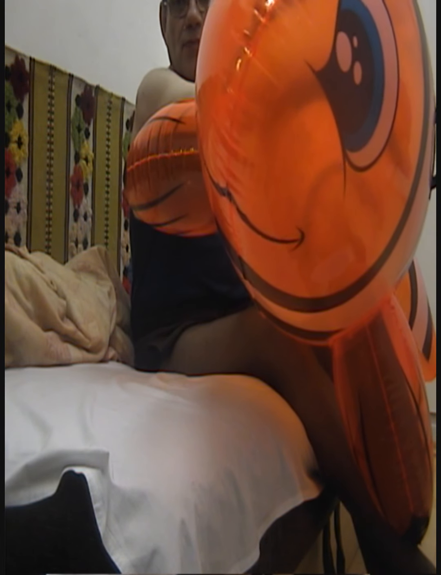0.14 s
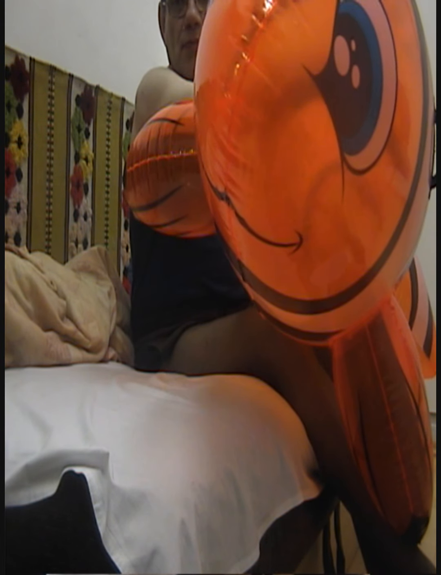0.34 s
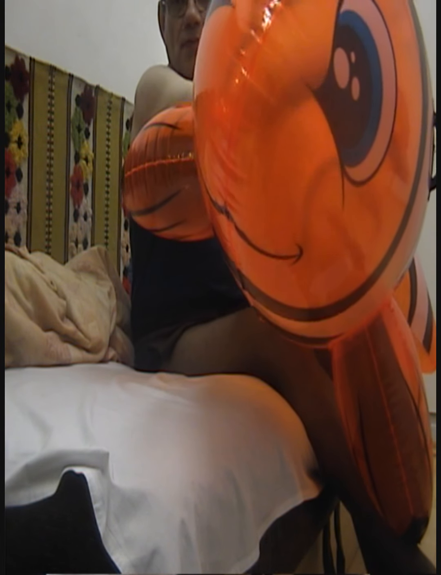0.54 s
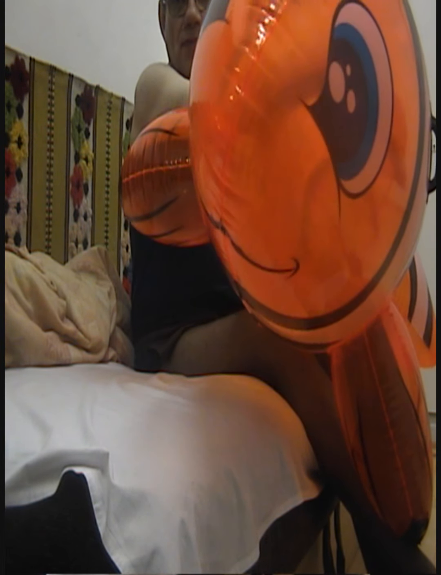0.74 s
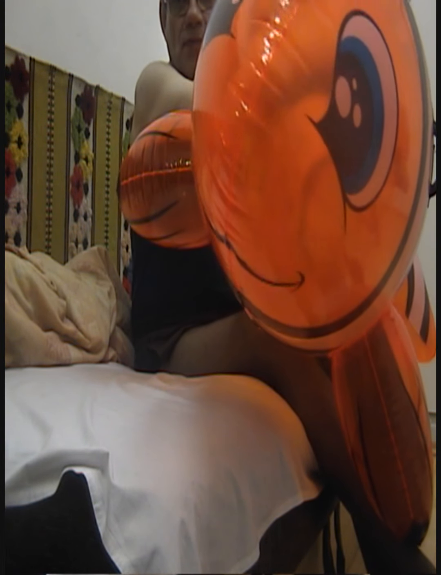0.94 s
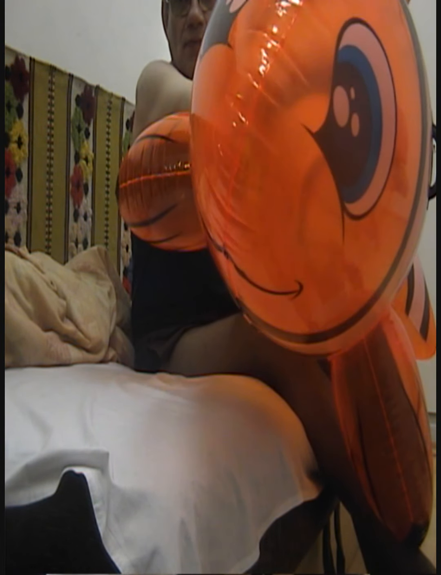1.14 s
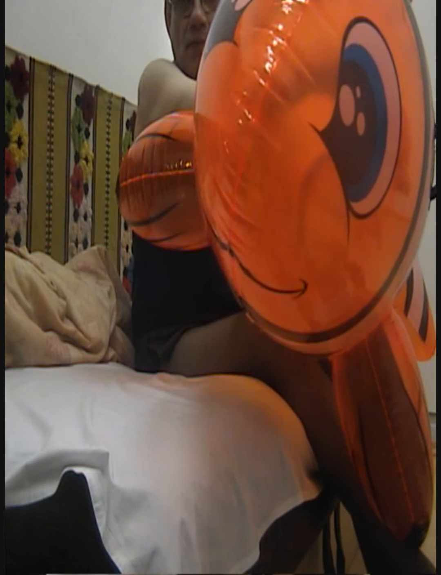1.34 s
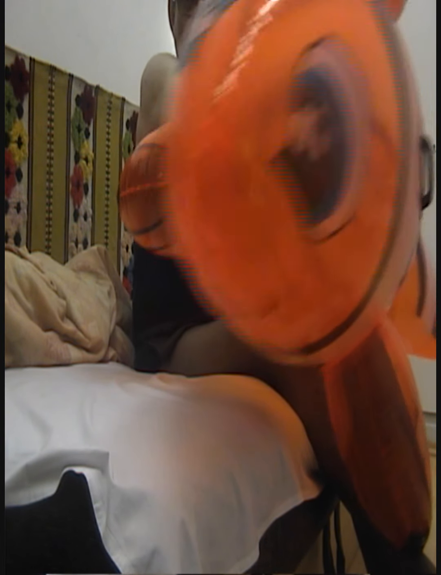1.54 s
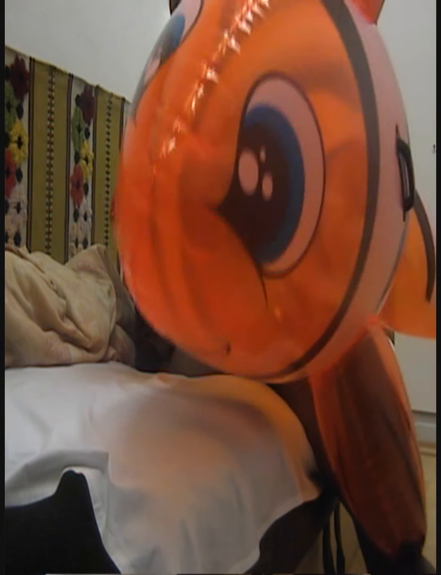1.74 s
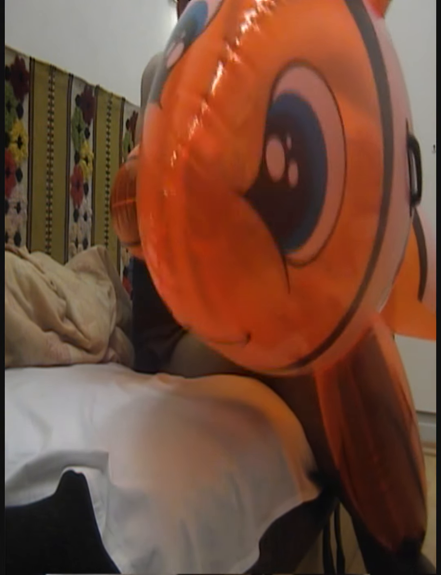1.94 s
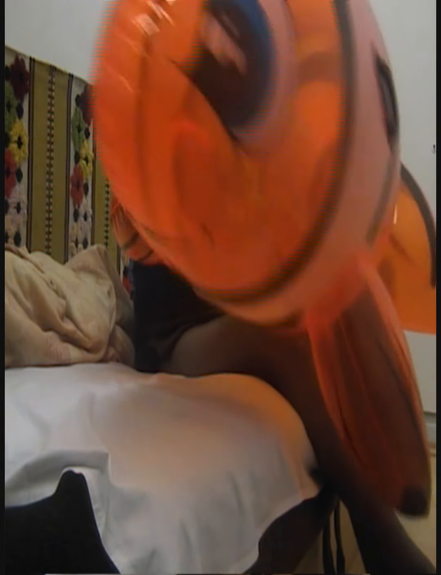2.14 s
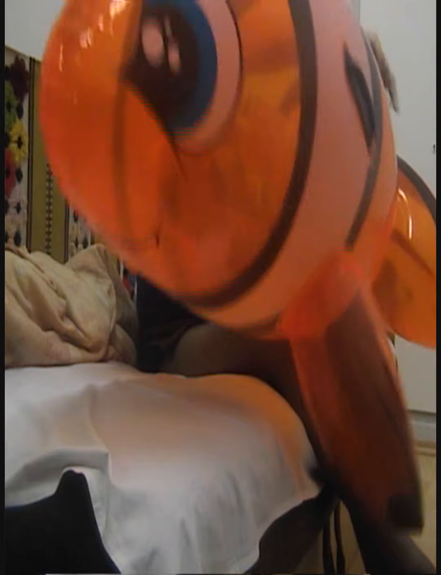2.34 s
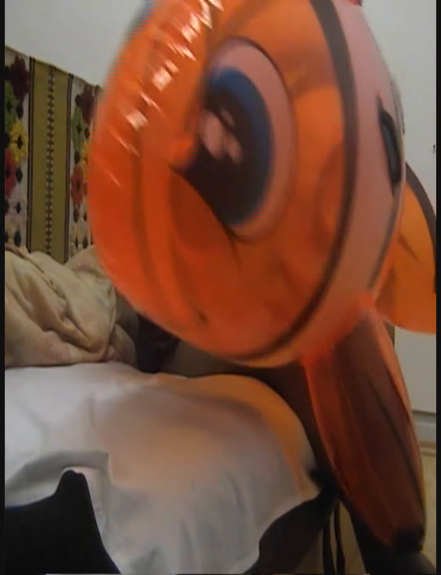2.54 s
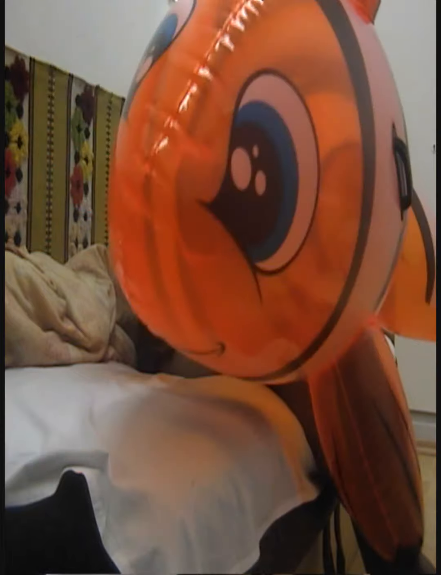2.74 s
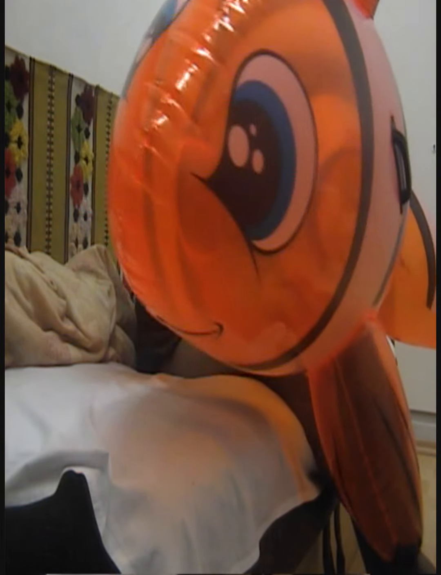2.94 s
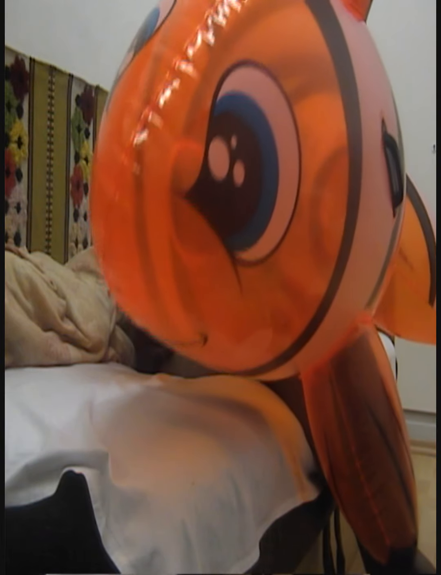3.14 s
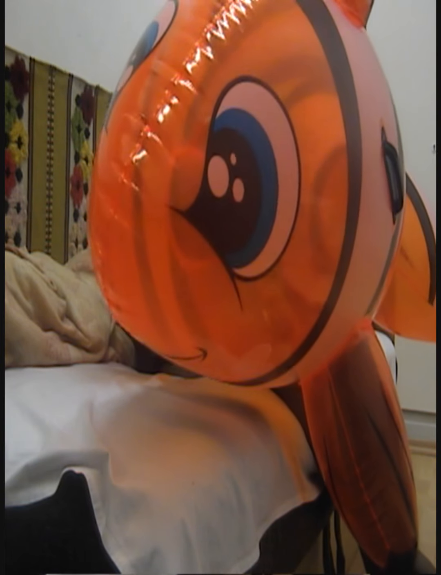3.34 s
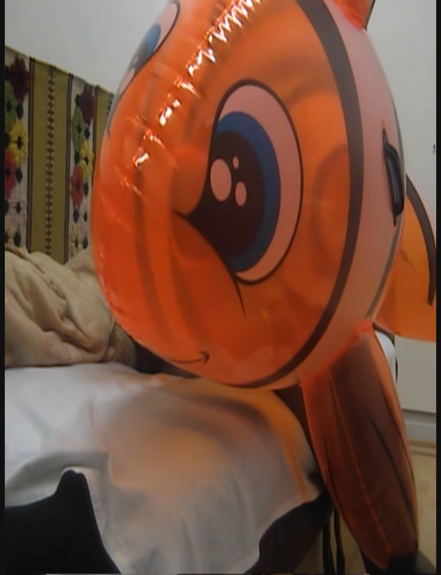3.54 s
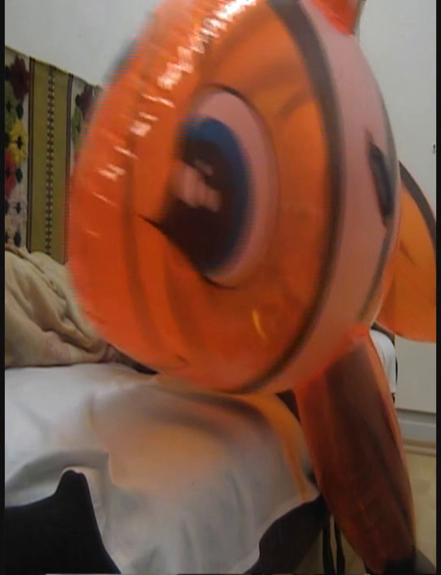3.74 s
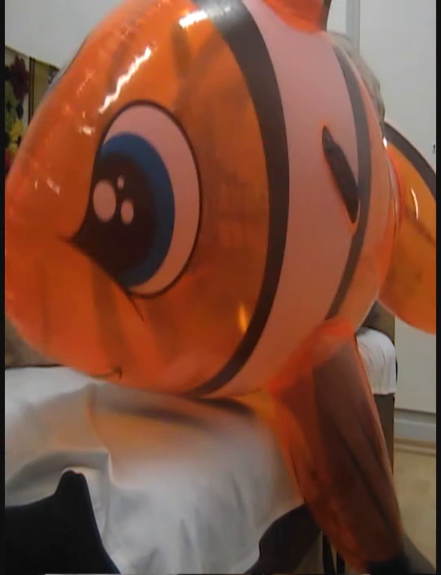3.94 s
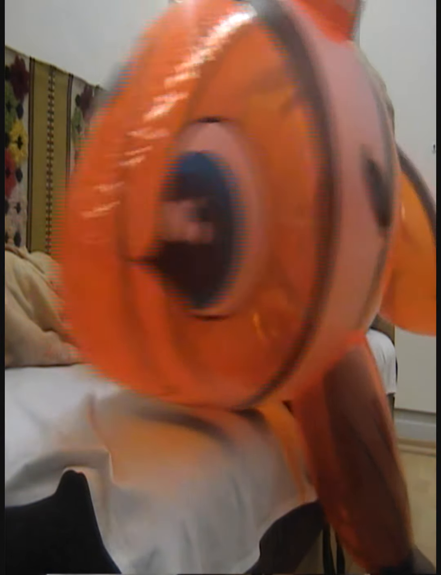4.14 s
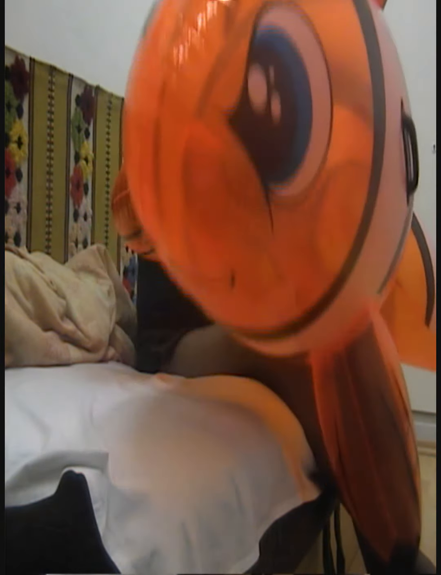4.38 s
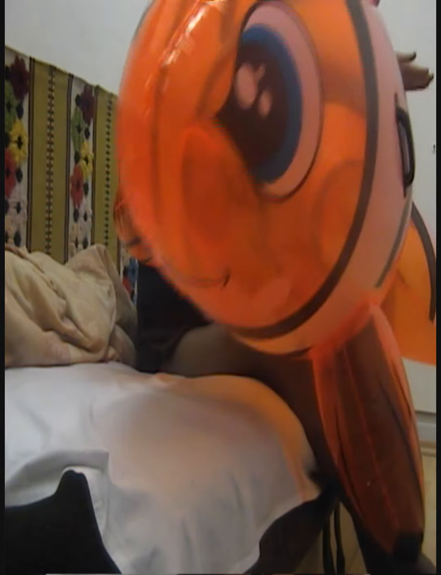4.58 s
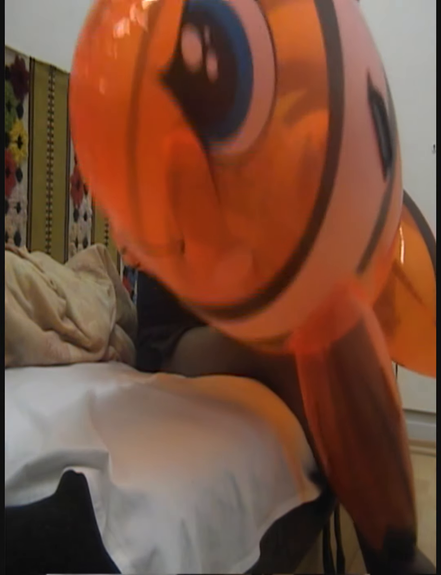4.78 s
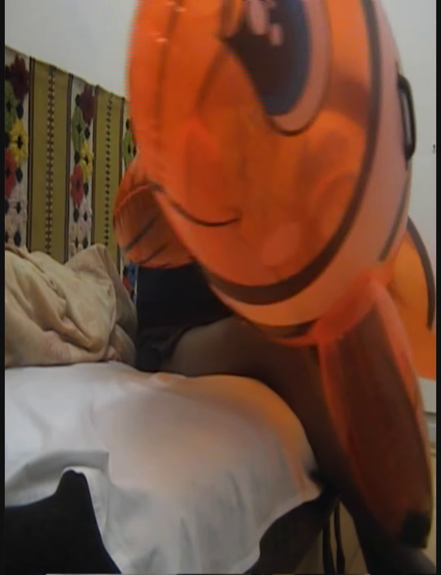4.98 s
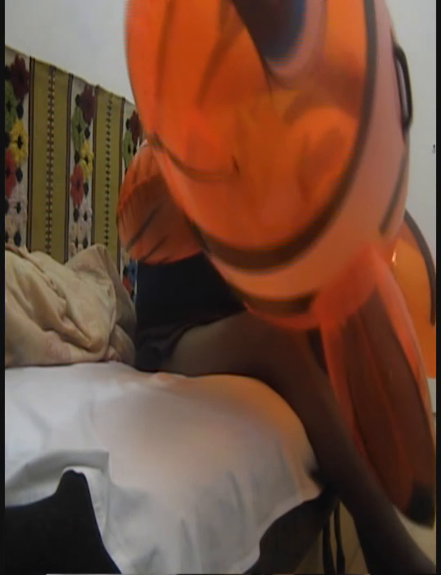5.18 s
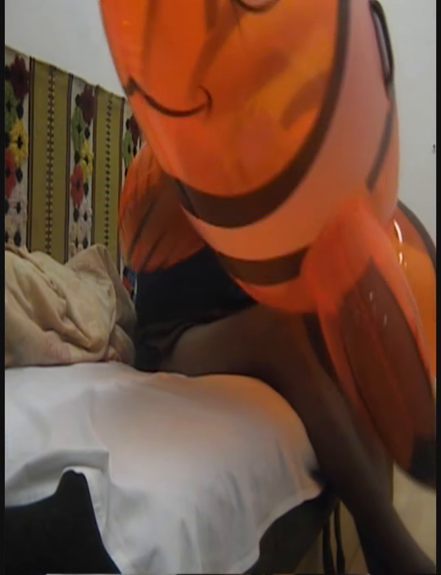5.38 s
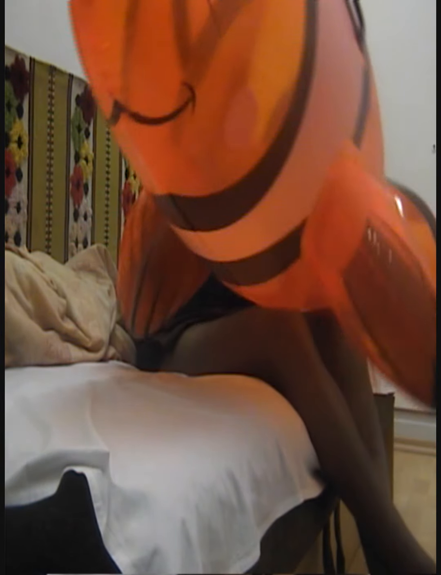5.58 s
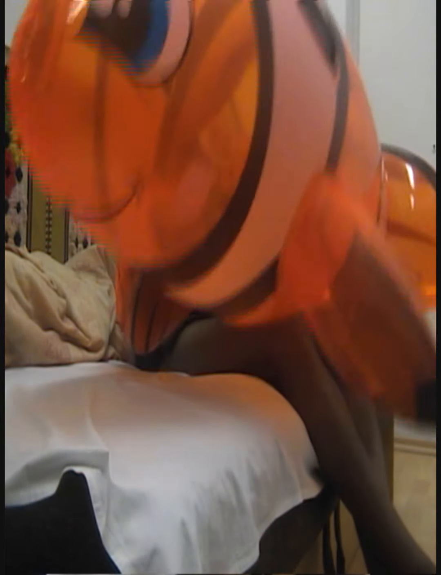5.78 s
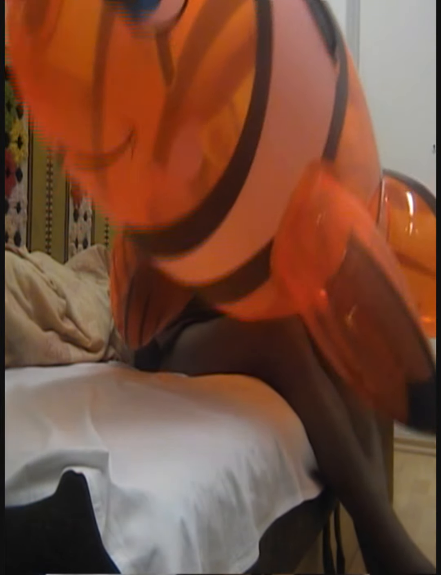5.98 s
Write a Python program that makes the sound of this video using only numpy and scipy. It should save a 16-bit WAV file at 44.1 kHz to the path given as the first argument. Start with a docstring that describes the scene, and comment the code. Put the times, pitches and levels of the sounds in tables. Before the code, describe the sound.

Hands shift a large air-filled plastic toy right by the microphone. Its skin squeaks and swishes, and knocks ring briefly with a dull, drumlike boom. A crisp knock near two seconds gives way to faint rubbing and airy fizzes; a heavy thump lands just before four seconds, followed by a rapid cluster and looser taps. The small room answers briefly over quiet hiss and hum.

```python
"""Mains hum, a thin whine and a soft hiss lie under a small bedroom from start to end, near a camera.
A taut inflated vinyl toy creaks and swishes in the hands: slips drive its skin, fine ones make the treble.
Soft knocks come first, each a noise slap with ringing drum modes; palm strokes join in.
After a sharp knock at about 2 s come high fizzes, then the hardest knock near 3.9 s.
A tight flurry at 4.8 s thins to spaced knocks; decaying noise answers as the room."""
import sys
import numpy as np
from scipy import signal
from scipy.fft import rfft, irfft, next_fast_len
from scipy.io import wavfile
from scipy.ndimage import map_coordinates

SR = 44100
rng = np.random.default_rng(int(sys.argv[2]) if len(sys.argv) > 2 else 0)


def unload_audio(sound):
    """Save the sound as a 16-bit wav file, at the path given as the first command line argument."""
    columns = np.transpose(np.atleast_2d(sound))
    # keep every value between -1 and 1, then stretch to whole-number steps
    steps = np.round(np.clip(columns, -1, 1) * 32767)
    wavfile.write(sys.argv[1], SR, steps.astype(np.int16))


N = 265041

# ringing modes of the skin and inner air: pitch_hz, level_db, t60_s
DRUM_MODES = [(95, -27, 0.39), (162.7, -11, .3), (234, -13, 0.38), (265.3, -8, .3), (326, -8, 0.5),
              (377.6, -6, 0.35), (398.8, -6, 0.33), (433.5, -9, 0.45), (473, -16, 0.5),
              (490.5, -10.5, 0.16), (543, -6, .33), (589, -9, 0.11), (620, -18, 0.22), (687, -11, 0.28),
              (750, -12.5, 0.19), (834, -11, 0.14), (1000, -18, 0.15), (1160, -19.5, 0.15),
              (1444, -13.5, 0.37), (1670, -32, 0.44), (1970, -24, 0.4)]


def amp(db):
    """Turn dB into gain."""
    return 10 ** (np.asarray(db) / 20)


def unit(x):
    """Scale to rms 1."""
    return x / np.sqrt(np.mean(x ** 2) + 1e-20)


def along(points, hz):
    """Read a curve of (Hz, value) points on a log frequency axis."""
    point_hz, value = np.transpose(points)
    return np.interp(np.log(hz + 1), np.log(point_hz + 1), value)


def wobble(rate):
    """A smooth random curve with rate knots a second."""
    knots = rng.standard_normal(int(N * rate / SR) + 4)
    return map_coordinates(knots, [np.arange(N) * rate / SR])


def filtered(x, response):
    """Multiply the spectrum of x by a complex response of frequency."""
    size = next_fast_len(x.shape[-1] + SR // 2)
    spectrum = rfft(x, size) * response(np.fft.rfftfreq(size, 1 / SR))
    return irfft(spectrum, size)[..., :x.shape[-1]]


def ports(pair, alike):
    """Mix two unrelated signals into left and right of the given likeness per frequency."""
    def mid_side_gains(hz):
        turn = np.arccos(np.clip(along(alike, hz), -1, 1)) / 2
        return np.array([np.cos(turn), np.sin(turn)])

    mid, side = filtered(pair, mid_side_gains)
    return np.array([mid + side, mid - side])


def background():
    """Shaped noise hisses, sines with unsteady pitch and level hum and whine, single swings bump."""
    # room and microphone noise, shape only: pitch_hz, level_db_per_hz
    hush_curve = [(30, -38), (70, -17), (130, -14), (200, -11.5), (290, -8.5), (420, -4.5), (900, -6.5),
                  (1300, -12), (1550, -8), (1900, -15), (4200, -20), (4900, -18), (6500, -20.5),
                  (8300, -21), (10500, -24), (15600, -30)]
    # spread of that noise: pitch_hz, left_right_likeness (-1 to 1)
    hush_likeness = [(60, 0.49), (180, 0.85), (550, 0.92), (1650, -0.0096), (4970, -0.57), (15000, 0.24)]
    # steady tones: pitch_hz, level_db (rms), waver_hz
    tone_table = [(50, -74, .1), (99.4, -80, 3), (298, -75.5, 2), (588, -82.5, 3.35), (934, -87, 1.3),
                  (1494, -73, 2.48), (1648, -80.5, 3.9), (8300, -99, 78), (12050, -95, 200)]
    # faint low bumps of one swing: middle_s, peak_db, length_s
    bump_table = [(0.456, -62, .024), (1.457, -60, .024), (3.01, -60, 0.02), (4.01, -55, 0.019),
                  (5.581, -60, 0.022)]
    t = np.arange(N) / SR

    hiss = filtered(rng.standard_normal((2, N)), lambda hz: amp(along(hush_curve, hz)))
    hiss = amp(-64.5 + 0.17 * wobble(5.27)) * ports(unit(hiss), hush_likeness)

    tones = np.zeros(N)
    for pitch_hz, level_db, waver_hz in tone_table:
        level = np.sqrt(2) * amp(level_db + 0.18 * waver_hz ** .5 * wobble(5))
        phase = 2 * np.pi * np.cumsum(pitch_hz + waver_hz * wobble(25)) / SR
        tones += level * np.sin(phase)

    bumps = np.zeros(N)
    for middle_s, peak_db, length_s in bump_table:
        swing = np.clip((t - middle_s) / length_s, -.5, .5)
        bumps += amp(peak_db) * np.sin(-2 * np.pi * swing)
    return hiss + tones + bumps


def slips(rate, spread_db):
    """Stick-slip friction: dense clicks of uneven size over steady noise."""
    size, sign, chance = rng.random((3, 2, N))
    clicks = (chance < rate / SR) * amp(spread_db * size) * np.sign(sign - .5)
    return unit(clicks) + 0.69 * rng.standard_normal((2, N))


def skin(hz):
    """Response of the drum modes as a causal bank of resonators of alternating sign."""
    total = 0
    for k, (pitch_hz, level_db, t60_s) in enumerate(DRUM_MODES):
        width_hz = np.log(1000) / (np.pi * t60_s)
        mode = 1j * hz * width_hz / (pitch_hz * pitch_hz - hz * hz + 1j * hz * width_hz)
        total = total + (-1) ** k * amp(level_db) * mode
    return total


def rubbing(skids):
    """Slow slips creak and boom through the skin; fast fine ones swish."""
    # the toy shifting in the hands: start_s, creak_db (rms), swish_db (rms), before the grip varies
    grip_table = [(0, -68, -74), (.27, -76, -74), (.5, -72, -70), (.85, -68, -66), (1.07, -69, -78),
                  (1.55, -70, -77), (1.95, -72, -75), (2.3, -68, -68), (2.55, -72, -64), (2.8, -64, -73),
                  (2.95, -70, -75), (3.12, -84, -80), (3.7, -81, -76), (3.95, -80, -62), (4.25, -76, -78),
                  (4.38, -62, -66), (4.52, -80, -80), (4.8, -60, -64), (5.0, -78, -75), (5.19, -78, -76),
                  (5.3, -72, -64), (6.01, -65, -63)]
    # colour of the creak: pitch_hz, level_db_per_hz
    creak_curve = [(60, -27), (150, -3.5), (500, -4.5), (780, 1), (1300, -4), (2400, -13.5), (4200, -20.5),
                   (8000, -34.5), (15000, -73)]
    # colour of the swish: pitch_hz, level_db_per_hz
    swish_curve = [(800, -28), (2000, -1.5), (4000, -0.5), (6500, -3), (9000, -7.5), (12000, -15.5),
                   (15700, -26)]
    grip_fine = .35  # share of the finest hiss, 0-1
    t = np.arange(N) / SR
    start_s, *columns = np.transpose(grip_table)
    creak_db, swish_db = (np.interp(t, start_s, column) for column in columns)

    grip = wobble(45)  # the pressure of the hand varies
    force = (amp(creak_db) + skids) * amp(1.22 * grip)
    rough = slips(rate=900, spread_db=13)
    creak = force * unit(filtered(rough, lambda hz: amp(along(creak_curve, hz))))
    boom = unit(filtered(force * rough, skin)) * np.sqrt(np.mean(force ** 2))

    fast = slips(rate=5000, spread_db=6)
    swish = unit(filtered(fast, lambda hz: amp(along(swish_curve, hz))))
    # a light touch sheds the lower part
    thin = unit(filtered(swish, lambda hz: (hz / 9000) ** 1.45))
    full_gain, fine_gain = strokes(t)
    shifting = amp(swish_db) + amp(-32) * skids
    full_gain = full_gain + (1 - grip_fine) * shifting
    fine_gain = fine_gain + grip_fine * shifting
    hissing = full_gain * swish + 0.64 * fine_gain * thin
    return creak + amp(-12.5) * boom + amp(2.3 * grip) * hissing


def room(x, level_db):
    """Diffuse echoes: noise whose power in each band fills with the sound and drains at that band's speed."""
    # decay of the room: pitch_hz, t60_s
    room_decay = [(80, 0.59), (300, 0.21), (1000, 0.33), (4000, 0.34), (12000, 0.23)]
    frames = dict(nperseg=512, noverlap=384)
    delayed = np.pad(x[0], (520, 0))[:N]  # 520 samples, about 12 ms
    hz, t, spectrum = signal.stft(delayed, SR, **frames)
    keep = amp(-120 * (t[1] - t[0]) / along(room_decay, hz))  # of the power, per frame
    power = np.array([signal.lfilter([1 - k], [1, -k], band)
                      for k, band in zip(keep, np.abs(spectrum) ** 2)])
    noise = signal.stft(rng.standard_normal((2, N)), SR, **frames)[2]
    noise = noise / np.sqrt(np.mean(np.abs(noise) ** 2))
    echoes = signal.istft(noise * np.sqrt(power), SR, **frames)[1][:, :N]
    return amp(level_db) * echoes


def drift(spread=0.72):
    """A phase that wanders for half a second: the soft skin never holds a pitch exactly."""
    steps = np.cumsum(spread * rng.standard_normal(26)) + rng.uniform(0, 2 * np.pi)
    return np.interp(np.linspace(0, 25, SR // 2), np.arange(26), steps)


def knocks():
    """Each knock is a short slap with the drum modes ringing after it; the hand skids on."""
    # knocks on the skin: start_s, level_db (nominal peak), slap_hz, ring_db (relative to level_db),
    # ring_tilt_db_per_octave, skid_db (rms at its start), skid_t60_s
    knock_table = [(0.328,-52,705,-9,-7,-63,.5), (0.41,-54,791,-10,0.1,-76,.3),
                   (0.472,-45.5,1000,-17,2,-59,.3), (0.609,-48,837,-14,3,-61,.3),
                   (0.67,-44,920,-19,1,-58,.3), (0.892,-50,377,-19,0.1,-74,.3),
                   (0.977,-51,400,-13,-6,-63,.2), (1.532,-49,697,-17,3,-65,.2),
                   (1.633,-40.5,600,-9.5,-2,-54,.55), (2.038,-41.5,750,-13,0,-55,.3),
                   (2.062,-21,1120,-20,7,-42,.3), (2.127,-29,800,-16,6,-45,.15),
                   (2.239,-43.5,1120,-14,0,-58,.25), (2.303,-36,796,-17.5,4.5,-57,.6),
                   (2.499,-42,704,-13,1,-55,.8), (2.614,-38,1250,-20,1.5,-60,.12),
                   (2.944,-35.5,754,-20.5,5,-54,.4), (3.728,-45.5,780,-17,7,-60,.4),
                   (3.811,-42,1500,-21,3,-58,.2), (3.868,-39,1300,-26,7,-63,.15),
                   (3.889,-13,560,-9.5,-2,-44,.2), (4.401,-44,950,-22,5,-60,.25),
                   (4.561,-41,960,-19,7,-51,.4), (4.589,-33,905,-22,8,-48,.35),
                   (4.682,-31,990,-15,4,-47,.9), (4.812,-44,800,-12,0,-43,.3),
                   (4.826,-23.5,1060,-16,-8,-35,.15), (4.839,-25,780,-15,0.1,-40,.12),
                   (4.856,-27,770,-12.5,-4,-52,.3), (5.199,-29.5,810,-18,0,-44,.4),
                   (5.23,-28,1020,-11,2,-50,.3), (5.34,-35.5,826,-21,-3,-55,.18),
                   (5.477,-38,905,-18,1,-54,.4), (5.604,-41,660,-10,4.5,-54,.9),
                   (5.786,-37,766,-17,7,-56,.7), (5.864,-35,820,-20,1.5,-60,.2),
                   (5.924,-36.5,740,-16,2,-56,.3), (5.986,-33.5,670,-17,1,-54,.5)]
    # colour of the crack: pitch_hz, level_db_per_hz
    crack_curve = [(60, -27), (300, 11), (1500, -38), (4000, -25), (8000, -36), (15000, -41)]
    slap_db, crack_db = -2, -11  # slap under the nominal peak, crack under the slap
    skid_hold_s = .015  # a skid starts at once, holds this long, then dies away
    blows, drum = np.zeros((2, 2, N + SR))
    skids = np.zeros(N + SR)
    t = np.arange(SR // 2) / SR
    for start_s, level_db, slap_hz, ring_db, tilt_db, skid_db, skid_t60_s in knock_table:
        burst_level = np.minimum(t / 0.0011, 1) * amp(-60 * (t / 0.0098) ** 2)
        burst = burst_level * rng.standard_normal((2, len(t)))
        width_hz = 0.75 * slap_hz  # the dented skin springs back in two or three swings
        dent = filtered(burst, lambda hz: (
            1j * hz * width_hz / (slap_hz ** 2 - hz * hz + 1j * hz * width_hz)) ** 2)
        crack = filtered(burst, lambda hz: amp(along(crack_curve, hz)))
        slap = dent / np.abs(dent).max(axis=1, keepdims=True)
        slap = slap + amp(crack_db) * crack / np.abs(crack).max()

        ring = np.zeros(len(t))
        for pitch_hz, mode_db, t60_s in DRUM_MODES:
            tilted_db = mode_db + tilt_db * np.log2(pitch_hz / 400) + rng.normal(0, 1.56)
            ring += amp(tilted_db - 60 * t / t60_s) * np.sin(2 * np.pi * pitch_hz * t + drift())
        ring = ring * (1 - np.exp(-(t / 0.0072) ** 2))  # the air inside takes a moment to swing up

        skid = amp(skid_db - 60 * np.maximum(t - skid_hold_s, 0) / skid_t60_s)
        start = round(start_s * SR)
        span = slice(start, start + len(t))
        blows[:, span] += amp(level_db + slap_db) * slap
        drum[0, span] += amp(level_db + ring_db) * ring
        skids[span] += skid * (1 - (2 * t) ** 4)  # reaches zero at half a second
    return blows[:, :N], drum[:, :N], skids[:N]


def strokes(t):
    """Gains of the full and the finest swish as a palm slides: each stroke rises, holds and fades."""
    # a palm sliding over the vinyl: start_s, hold_s, swish_db (rms, before the grip varies),
    # fine_share (of the finest hiss, 0-1)
    stroke_table = [(1.63, .135, -57, .6), (2.02, .01, -60, .7), (2.055, .025, -50, .4),
                    (2.11, .025, -48, .4), (3.21, .02, -70, .45), (3.882, .03, -59, .1),
                    (4.31, .11, -65, .4), (4.555, .01, -57, .05), (4.585, .025, -52, 0),
                    (4.675, .02, -49, .25), (4.81, .015, -41, .05), (5.215, .05, -61, .5),
                    (5.78, .2, -68, 1)]
    rise_s, fade_db_per_s = .015, 330
    full, fine = np.zeros((2, N))
    for start_s, hold_s, swish_db, fine_share in stroke_table:
        rise = np.clip((t - start_s) / rise_s, 0, 1) ** 2
        fading_s = np.maximum(t - start_s - rise_s - hold_s, 0)
        gain = rise * amp(swish_db - fade_db_per_s * fading_s)
        share = np.clip(fine_share, 0, 1)
        full = full + (1 - share) * gain
        fine = fine + share * gain
    return full, fine


def fizzes():
    """Short puffs of band-limited noise in the treble, each dying away from its start."""
    # faint high fizzes: start_s, level_db (rms at the start), centre_hz, width_hz, t60_s
    fizz_table = [(2.855, -76, 8100, 500, .3), (2.97, -84, 8900, 700, 0.46),
                  (3.214, -64.5, 8450, 1520, 0.35), (3.213, -67, 5570, 1200, 0.28),
                  (3.33, -72, 7700, 900, .3), (3.424, -60, 6500, 5960, .02)]
    out = np.zeros((2, N + SR))
    t = np.arange(SR // 2) / SR
    for start_s, level_db, centre_hz, width_hz, t60_s in fizz_table:
        noise = rng.standard_normal((2, len(t)))
        band = filtered(noise, lambda hz: np.exp(-((hz - centre_hz) / width_hz) ** 2 * 2))
        start = round(start_s * SR)
        out[:, start:start + len(t)] += amp(level_db - 60 * t / t60_s) * unit(band)
    return out[:, :N]


def scene():
    """The toy near the microphone ports, the room around it, the background beneath."""
    # spread of the toy and its echoes: pitch_hz, left_right_likeness (-1 to 1)
    near_likeness = [(60, 0.87), (400, 0.99), (1000, 0.99), (2400, 0.75), (6000, 0.52), (10000, 0.48),
                     (12000, 0.58)]
    # colour given by the camera housing: pitch_hz, level_db
    housing_curve = [(30, -18), (70, -3.5), (130, -2), (4100, 0), (4800, -9), (5700, -4), (15000, 5)]
    # phase between the microphone ports: pitch_hz, left_lead_radians
    port_lead = [(20, 0), (2000, 0), (4100, .6), (8900, .2), (10200, -.6), (10800, -3.1), (16000, -3.0)]
    # balance of the two channels: pitch_hz, left_over_right_db
    port_lean = [(60, 0.5), (150, 0.5), (380, 1), (950, -0.5), (2380, -4), (5980, -1), (15000, 0.0)]
    blows, drum, skids = knocks()
    rubs = rubbing(skids) + fizzes()
    echoes = room(blows, level_db=-1) + room(rubs, level_db=-3.5)
    near = ports(blows + drum + rubs + echoes, near_likeness)
    near = filtered(near, lambda hz: (
        amp(along(housing_curve, hz)) * np.exp(.5j * np.outer([1, -1], along(port_lead, hz)))))
    return filtered(near + background(), lambda hz: amp(np.outer([.5, -.5], along(port_lean, hz))))


def record(dry):
    """The camera drops the deepest bass and keeps nothing above its band limit."""
    top_hz = 15725
    return filtered(dry, lambda hz: (hz < top_hz) * hz / (hz + 4))


dry = scene()
out = record(dry)
unload_audio(out)
```